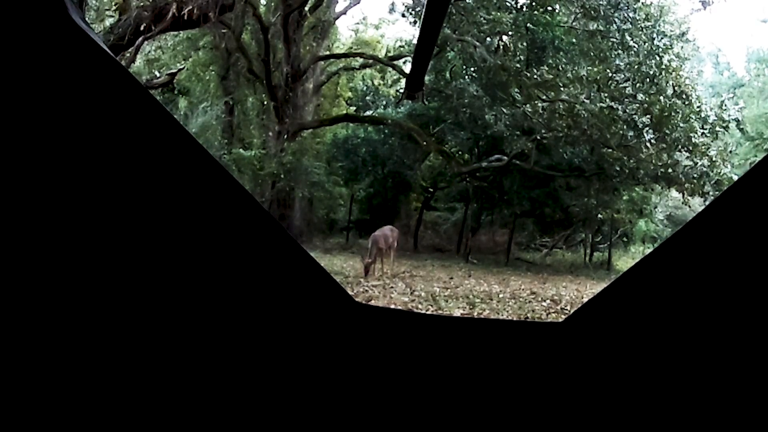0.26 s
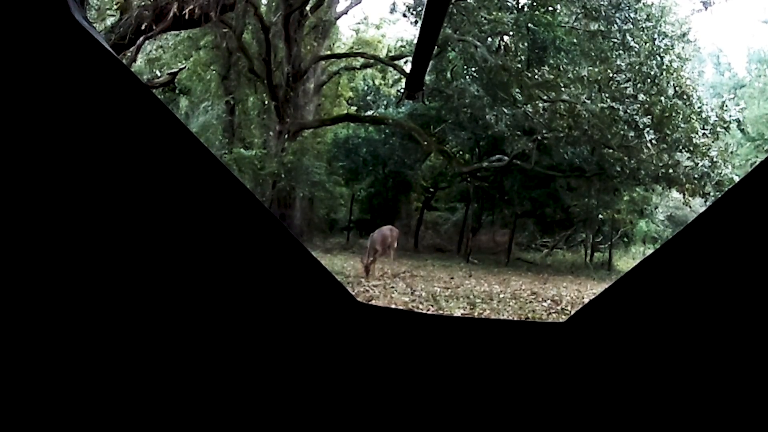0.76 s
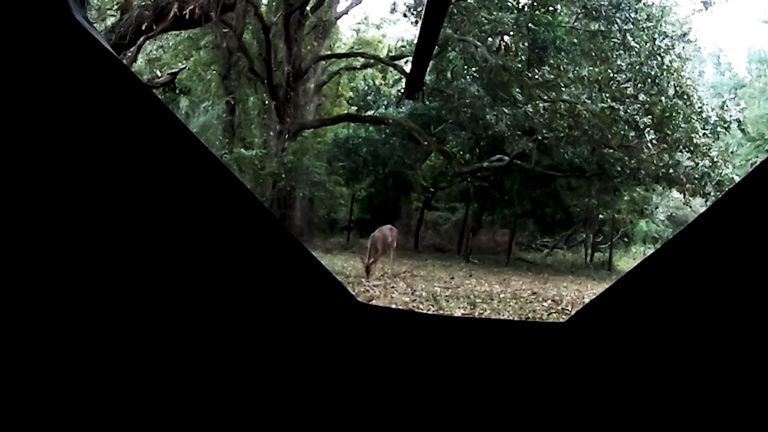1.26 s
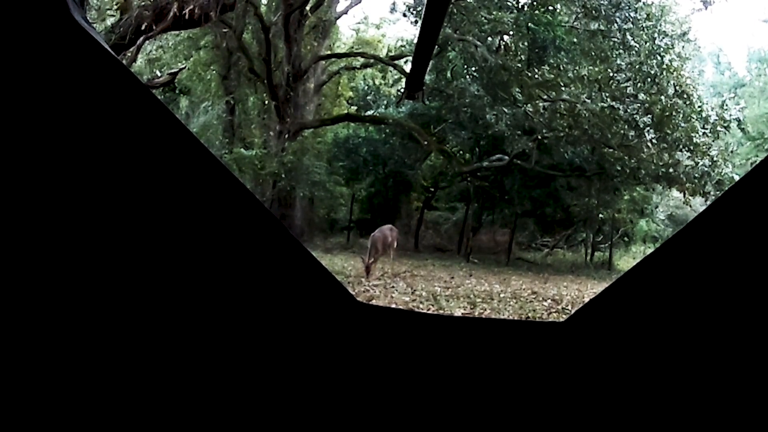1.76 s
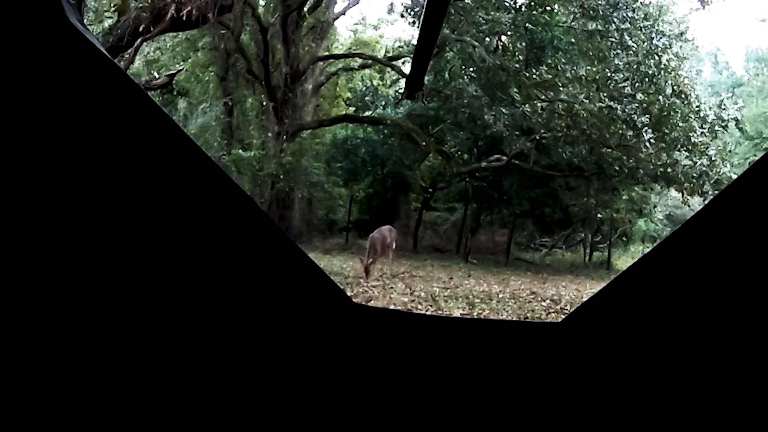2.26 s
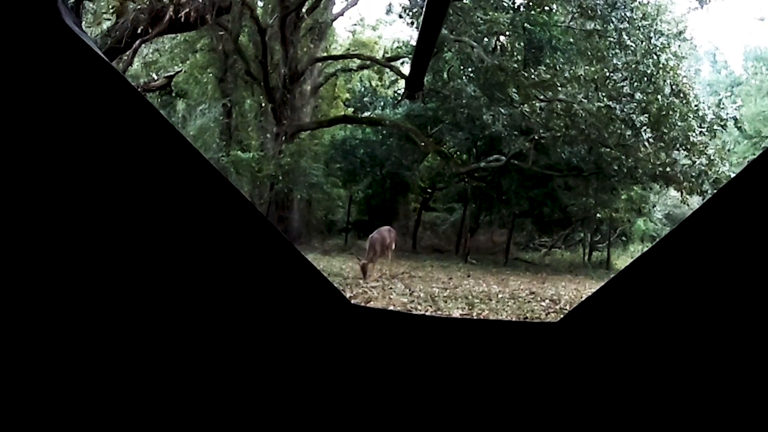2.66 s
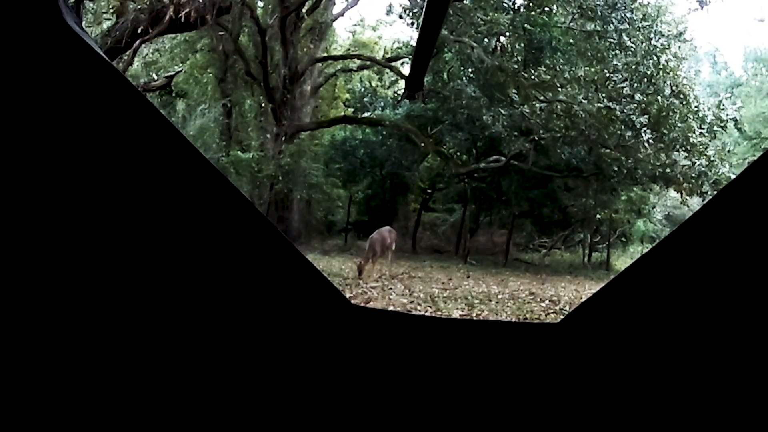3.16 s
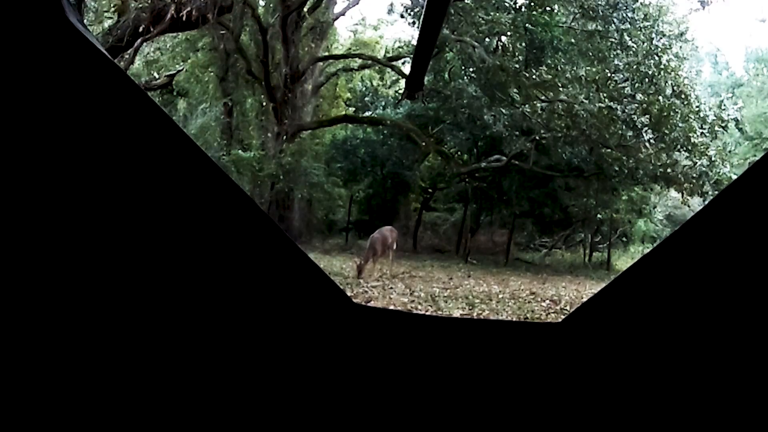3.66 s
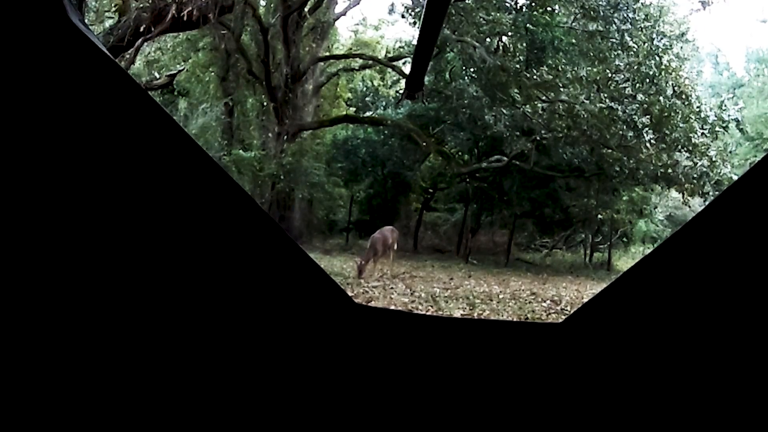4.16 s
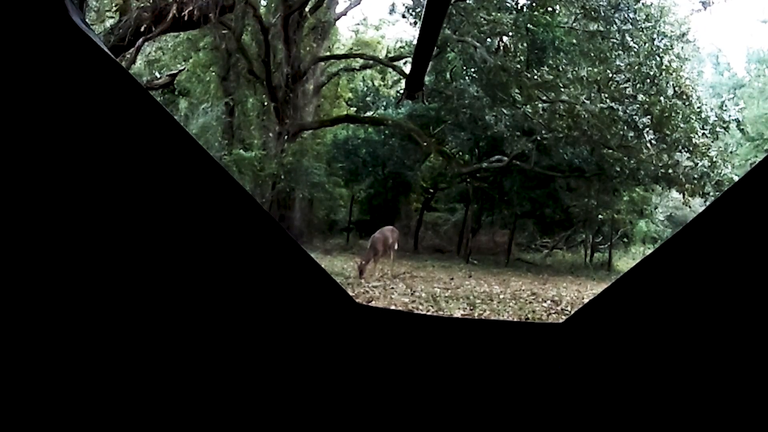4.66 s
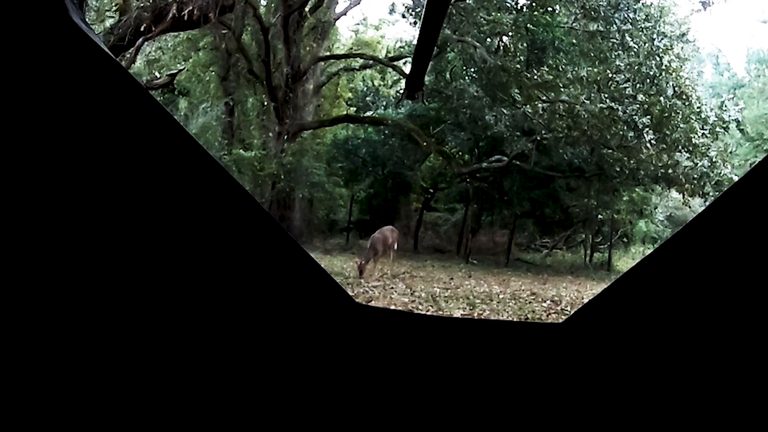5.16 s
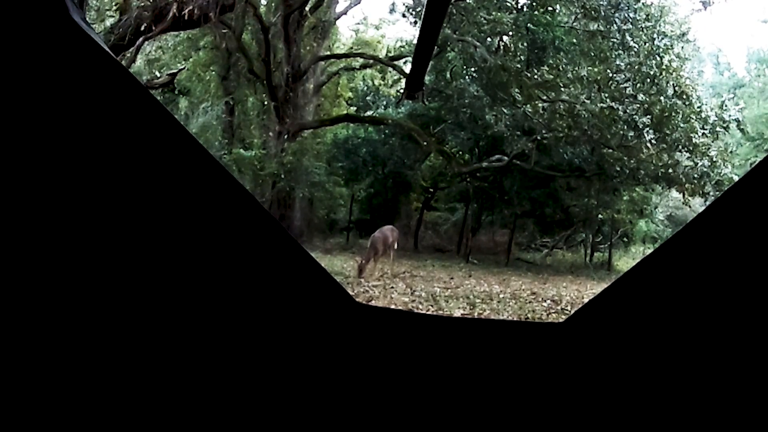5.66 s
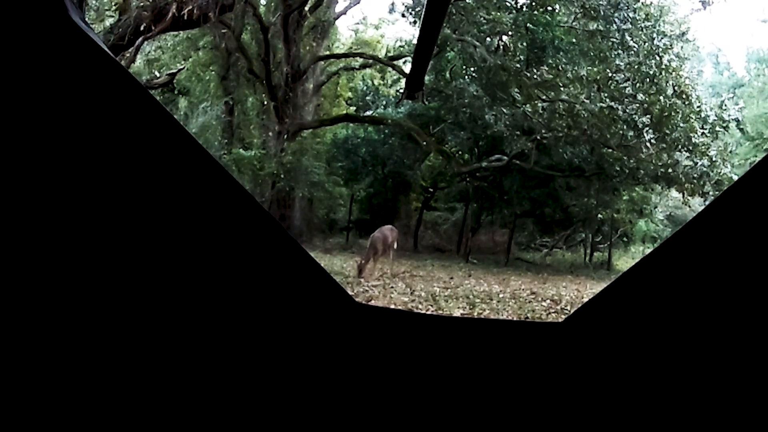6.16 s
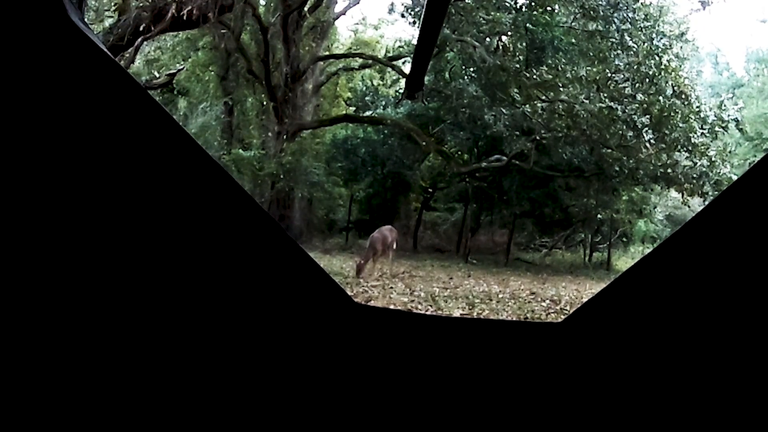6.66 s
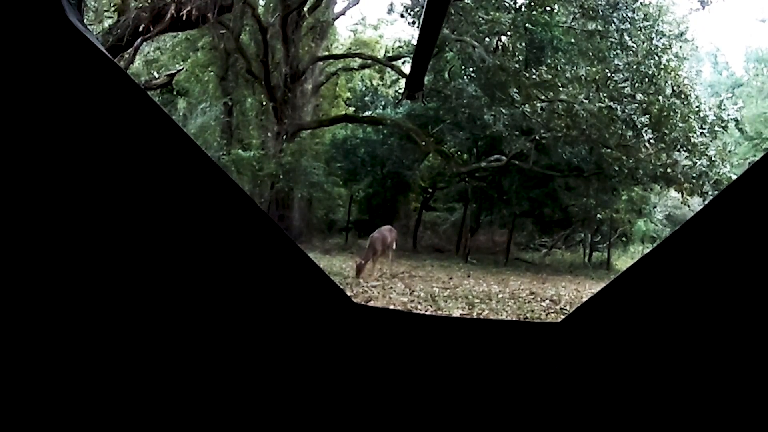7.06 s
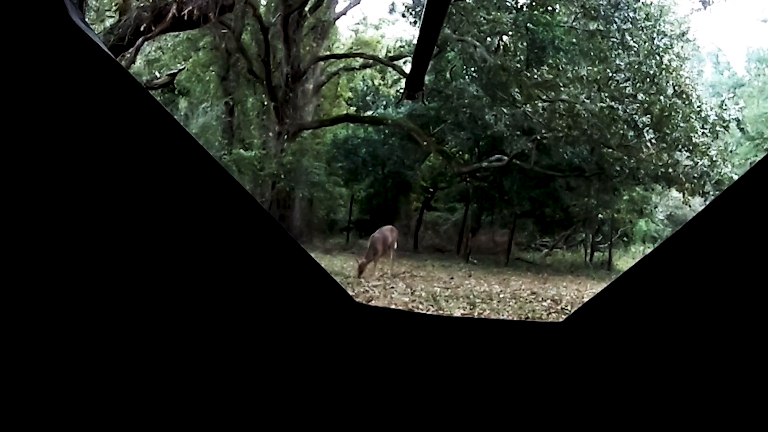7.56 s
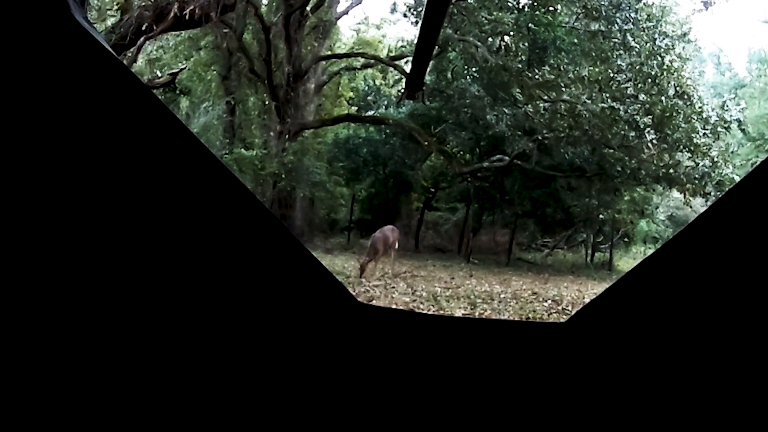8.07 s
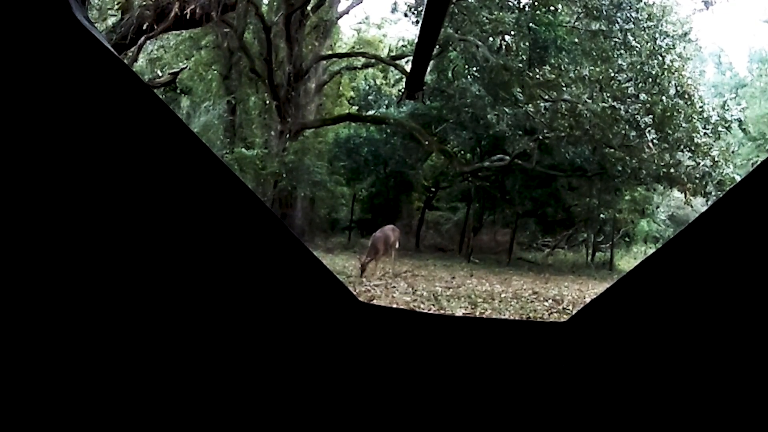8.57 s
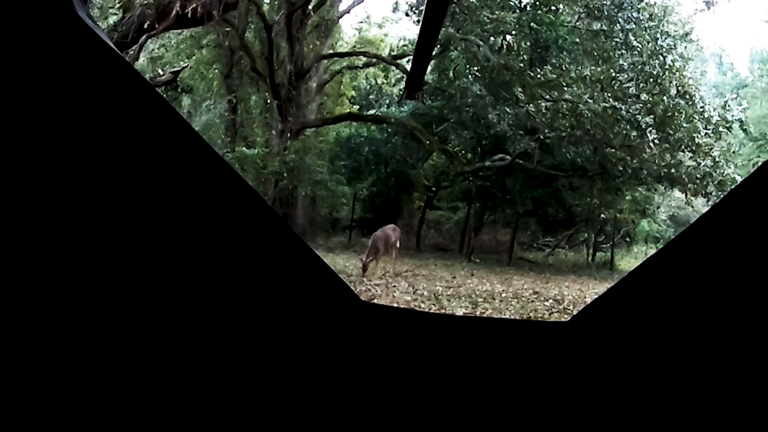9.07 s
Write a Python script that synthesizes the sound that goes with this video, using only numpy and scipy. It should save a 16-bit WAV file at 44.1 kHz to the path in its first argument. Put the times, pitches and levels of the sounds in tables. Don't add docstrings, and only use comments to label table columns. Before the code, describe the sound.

Crickets trill steadily over a low insect buzz in leafy woods; a small bird whistles two quick songs, then a low thump knocks the microphone.

```python
import sys
import numpy as np
from scipy import signal
from scipy.fft import rfft, irfft, next_fast_len
from scipy.io import wavfile

SR = 44100
rng = np.random.default_rng(int(sys.argv[2]) if len(sys.argv) > 2 else 0)


def int16_out(signal):
    q = np.round(np.clip(np.atleast_2d(signal).T, -1, 1) * 32767)
    wavfile.write(sys.argv[1], SR, q.astype(np.int16))


def how_loud(loudness_db):
    steps = np.asarray(loudness_db, float) / 20
    return 10 ** steps


N = 411012
TIME = np.arange(N) / SR
# f/Hz, level/dB
WIDTH = [(60, -10), (100, -2), (170, -1), (300, 3), (500, 8.5), (850, 12), (1450, 6.5), (2470, 1.5),
         (4200, -5), (7140, 12)]


def rms_one(x):
    return x / np.sqrt(np.mean(x ** 2) + 1e-20)


def level(rows):
    return how_loud(np.interp(TIME, *np.transpose(rows)))


def drift(rate):
    points = rng.standard_normal(400)
    return np.interp(TIME * rate, np.arange(400), points)


def at_hz(points, hz, beyond=None):
    f, db = np.transpose(points)
    return np.interp(np.log(hz + 1e-3), np.log(f), db, left=beyond, right=beyond)


def coloured(spectrum, width):
    size = next_fast_len(N, real=True)
    hz = np.fft.rfftfreq(size, 1 / SR)
    gains = how_loud(at_hz(spectrum, hz, -120)) * [hz ** 0, how_loud(at_hz(width, hz))]
    noise = rfft(rng.standard_normal((2, size)))
    mid, side = irfft(noise * gains, size)[:, :N]
    return np.array([mid + side, mid - side]) / np.std(mid)


def panned(x, pan_db):
    return x * how_loud([[pan_db / 2], [-pan_db / 2]])


def woods(x, t60, gap_s):
    t = TIME[:SR]
    tail = rng.standard_normal((2, SR)) * how_loud(-60 * t / t60) * np.clip(t / gap_s, 0, 1)
    tail = tail / np.sqrt(np.sum(tail ** 2) / 2)
    return signal.fftconvolve(np.atleast_2d(x), tail, axes=1)[:, :N]


def add(out, rows, start_s=0, lead=0., stretch=0.96, waver=0.0052, gain=1):
    s, hz, db = np.transpose(rows)
    span = slice(int((start_s + s[0]) * SR), int((start_s + s[-1]) * SR))
    t = TIME[span] - start_s
    edges = np.clip(np.minimum(t - s[0], s[-1] - t) / 0.001, 0, 1)
    wobble = np.interp(t - s[0], np.arange(30) * 0.00278, rng.standard_normal(30))
    glide = stretch * np.interp(t, s, hz) * (1 + waver * wobble)
    phase = 2 * np.pi * np.cumsum(glide) / SR
    out[:, span] += gain * edges * how_loud(np.interp(t, s, db)) * np.sin(phase + [[lead], [0]])
    return out


def traffic():
    # f/Hz, level/dB
    rumble_spectrum = [(65, -47), (110, -18), (144, -3.5), (183, -1), (233, -9), (269, -17), (311, -16),
                       (350, -18.5), (458, -21), (534, -27), (778, -19.5), (1020, -33), (1100, -39.5),
                       (1430, -46), (2420, -120)]
    # t/s, level/dB
    nearness = [
        (0.0, -56),
        (0.31, -53),
        (2.92, -53),
        (7.25, -55),
        (9.3, -55),
    ]
    # f/Hz, level/dB
    deep_spectrum = [(8.8, -38), (15, -3.5), (48, -6), (70, -3.5), (86, -3.5), (108, -14.5), (113, -15),
                     (120, -17), (160, -40), (260, -120)]
    rumble = level(nearness) * how_loud(3.0) * coloured(rumble_spectrum, WIDTH)
    deep = how_loud(-57.5 + 3.1 * drift(10)) * coloured(deep_spectrum, [(20, -5), (50, -2.5), (110, 1)])
    return rumble + deep


def moving_air():
    # f/Hz, level/dB
    air_spectrum = [(560, -18), (950, -6.5), (1070, -9), (1410, -8), (2600, -15), (3520, -3.5),
                    (3970, -13.5), (4430, -15.5), (5000, -15.5), (5300, -9.5), (6890, -29), (11700, -120)]
    return how_loud(-64) * coloured(air_spectrum, WIDTH)


def capsule_hiss():
    # f/Hz, level/dB
    hiss_spectrum = [(7000, -30), (8000, -7), (8700, -5), (9300, -1), (10500, 0), (12200, -1), (13300, -4),
                     (14300, -10), (15100, -15), (15600, -60)]
    return how_loud(-76.5) * coloured(hiss_spectrum, [(8000, -0.27), (15000, -.3)])


def insect_drone():
    # f/Hz, level/dB
    drone_spectrum = [(3000, -17.5), (3250, -10), (3550, 0.5), (3800, -10.5), (4100, -20)]
    # t/s, level/dB
    drone_loudness = [(0, -65), (1.2, -66.5), (2.5, -62.5), (3.8, -67.5), (4.6, -62.5), (5.6, -66.5),
                      (6.9, -64), (9.32, -69)]
    swell = level(drone_loudness) * how_loud(2.1 * drift(6.4))
    return swell * coloured(drone_spectrum, [(3000, -12), (4000, -10.5)])


def cricket(top_hz, rate_from, rate_to, first_s, half_s=.0125, sag=.06, uneven_db=0.5):
    strokes = rate_from * (TIME - first_s) + (rate_to - rate_from) * TIME ** 2 / (2 * TIME[-1])
    number = np.round(strokes).astype(int)
    chance = rng.standard_normal((200, 3))[number + 2]
    place = np.clip((strokes - number) / rate_from / half_s, -1, 1)
    hz = top_hz * (1 - sag * place ** 2 + .002 * chance[:, 0])
    envelope = (1 - place ** 2) ** 0.79 * how_loud(uneven_db * chance[:, 1])
    return envelope, 2 * np.pi * np.cumsum(hz) / SR + 9 * chance[:, 2]


def far_chorus(count=6):
    # f/Hz, level/dB
    chorus_spectrum = [(4600, -60), (5100, -43.5), (5630, -13), (5830, -12), (6110, -4.5), (6500, -6.5),
                       (6740, -10), (7200, -20.5), (7650, -28), (8000, -34), (8500, -62), (9500, -90)]
    singers = np.zeros(N)
    for hz, (rate, first) in zip(np.linspace(5600, 7200, count), rng.random((count, 2))):
        pulse_rate = 13 + 3.5 * rate
        envelope, phase = cricket(hz, pulse_rate, pulse_rate, first / 17)
        singers += how_loud(at_hz(chorus_spectrum, hz)) * envelope * np.sin(phase)
    blur = coloured(chorus_spectrum, [(5000, 1.5), (8000, .5)])
    return how_loud(-6.5) * rms_one(woods(singers, t60=0.22, gap_s=0.0028)) + how_loud(-5.5) * blur


def far_birds():
    # t/s, f/Hz, level/dB
    chip_glide = [
        (1.983, 6500, -64),
        (1.989, 6900, -54),
        (1.998, 7300, -50),
        (2.012, 7940, -70),
        (2.02, 7840, -75.5),
    ]
    start_s, step_s = 4.261, .0684
    trill = np.zeros((2, N))
    for k, away in enumerate(np.linspace(-1.05, .95, 16) ** 4):
        hz, db = 4520 - 380 * away, -69 - 6 * away
        rising = [(-.01, hz * .95, db + 2), (0, hz * 1.02, db + 3), (.012, hz * 1.12, db)]
        add(trill, rising, start_s + k * step_s, waver=.015)
    chip = add(np.zeros((2, N)), chip_glide)
    far_trill = how_loud(1.5) * trill + how_loud(9.5) * woods(trill, t60=0.49, gap_s=.004)
    return far_trill + panned(chip, 4) + how_loud(12) * woods(chip, t60=0.24, gap_s=0.0068)


def bumps():
    knocks = [
        (5.438, -36, -34.5, 0.0078, 0.0),
        (5.480, -40, -38, 0.011, 0.0),
        (8.587, -22, -12.3, .021, .007),
        (8.636, -40, -27, 0.017, .012),
        (8.706, -34, -24, .018, .007),
        (8.787, -50, -37, 0.019, .007),
    ]
    # f/Hz, left level/dB, right level/dB, left pitch factor
    spring_modes = [
        (72, 0.0, 0.0, 1.04),
        (156, -14, -22, 1.0),
        (225, -25, -34, 1.0),
    ]
    out = np.zeros((2, N))
    for s, left_db, right_db, swing_s, lag_s in knocks:
        span = slice(int((s - .1) * SR), int((s + .2) * SR))
        t = TIME[span] - s - np.array([[lag_s], [0]])
        spread_s = np.where(t < 0, swing_s, 1.7 * swing_s)
        envelope = how_loud([[left_db], [right_db]]) * np.exp(-(t / spread_s) ** 2)
        for hz, left, right, left_pitch in spring_modes:
            mode_hz = hz * np.array([[left_pitch], [1]])
            out[:, span] += envelope * how_loud([[left], [right]]) * np.cos(2 * np.pi * mode_hz * t)
    return out


def wren_note(start_s, length_s, first_hz, turn_hz, last_hz, turn, crest, db, fall_db):
    place = np.linspace(0, 1, num=17)
    turn, crest = np.clip(turn, .05, .95), np.clip(crest, .05, .95)
    before = np.clip(1 - place / turn, 0, 1)
    after = np.clip((place - turn) / (1 - turn), 0, 1)
    hz = turn_hz + (first_hz - turn_hz) * before ** 1.504 + (last_hz - turn_hz) * after ** 1.52
    rise = 23.5 * np.clip(1 - place / crest, 0, 1) ** 2.06
    fall = fall_db * np.clip((place - crest) / (1 - crest), 0, 1) ** 1.43
    return np.transpose([start_s + length_s * place, hz, db - rise - fall])


def wren():
    # start in phrase t/s, length/s, first f/Hz, turning f/Hz, last f/Hz
    phrase_notes = [
        (-.022, 0.0168, 3450, 4040, 4020),
        (-.007, .035, 2896, 3211, 2730),
        (0.03, .037, 3050, 4130, 4160),
        (.089, .019, 5520, 4325, 4300),
        (.110, .029, 3150, 3235, 3116),
        (0.133, .047, 3100, 2455, 2520),
        (.213, .023, 2604, 2887, 2700),
        (.234, .036, 2404, 1640, 1590),
    ]
    # pitch turn place/0-1, crest place/0-1, crest level/dB, end loss/dB
    breaths = [(.9, .6, -16, 15), (.3, .4, 6, 21), (0.79, 0.27, -0.5, 15.5), (0.91, 0.25, -7.5, 10.5),
               (0.27, 0.65, 1.5, 10), (0.37, .3, -11, 17), (.6, .6, -8.5, 6), (.9, 0.08, -6.5, 12.5)]
    # pan/dB, left phase lead/rad
    note_places = [(14, 1.2), (0, 1.06), (3.5, 2.2), (12, .8), (-4.5, 1.3), (11, 1.86), (7, 2.6),
                   (-1, 0.87)]
    # t/s, level/dB, opening note extra/dB, low notes extra/dB, low notes pitch factor
    phrases = [
        (2.1933, -44, -5, 4, 1.0),
        (2.55, -40, 0.5, 0.5, 1.0),
        (2.9111, -40.5, 1.5, -2.5, 0.97),
        (5.792, -43.5, -3, 2.5, 0.98),
        (6.1523, -42, -2, 0.5, 0.96),
        (6.5215, -43, 1, 2, 0.99),
    ]
    # delay t/s, left level/dB, right level/dB
    trunk_echoes = [
        (.052, -16, -13),
        (.118, -19, -18),
        (.185, -21, -20),
    ]
    direct = np.zeros((2, N))
    for s, db, opening_db, low_db, low_pitch in phrases:
        stresses = [0, opening_db, 0, 0, 0, low_db, low_db, 0]
        pitches = [1, 1, 1, 1, 1, low_pitch, low_pitch, 1]
        for note, breath, (pan_db, lead), stress_db, pitch in zip(
                phrase_notes, breaths, note_places, stresses, pitches):
            gain = panned(how_loud(db + stress_db), pan_db)
            add(direct, wren_note(*note, *breath), s, lead, pitch, waver=.008, gain=gain)
    voice = direct[0] * how_loud(-4) + direct[1] * how_loud(-6)
    echoes = np.zeros((2, N))
    for s, left_db, right_db in trunk_echoes:
        echoes += np.roll(voice, int(s * SR)) * how_loud([[left_db], [right_db]])
    near_leaves = how_loud(-4) * woods(direct, t60=.06, gap_s=.002)
    trunks = woods(echoes, t60=.11, gap_s=.005)
    deep_woods = how_loud(-2.5) * woods(direct[0], t60=1.0, gap_s=0.014)
    return how_loud(-5.5) * direct + near_leaves + trunks + deep_woods


def near_crickets():
    songs = [
        (6095, 14.88, 14.9, .0424, -44.5),
        (5998, 14.52, 14.46, 0.0057, -46.5),
        (6390, 14.48, 14.56, 0.04324, -50),
        (6220, 16, 15, 0.0351, -53),
        (6500, 15.24, 15.26, .0512, -52),
    ]
    # half stroke/s, pitch sag/0-1, octave level/dB, left lag/us, pan/dB
    wings = [(.0125, .055, -34, 222, .9), (.015, .017, -50, 232, 3.5), (.012, .025, -56, 0, 0),
             (.012, .03, -56, -64, -4), (.012, .03, -56, -52, -2.5)]
    out = np.zeros((2, N))
    for (hz, rate_from, rate_to, first_s, db), (half_s, sag, octave_db, lag, pan_db) in zip(songs, wings):
        envelope, phase = cricket(hz, rate_from, rate_to, first_s, half_s, sag)
        phase = np.array([np.interp(TIME - lag / 1012000.0, TIME, phase), phase])
        tone = np.sin(phase) + how_loud(octave_db) * np.sin(2 * phase)
        out += panned(how_loud(db + 10 + 1.1 * drift(1.604)) * envelope * tone, pan_db)
    return out + how_loud(-10) * woods(out, t60=0.81, gap_s=0.0088)


def scene():
    # t/s, level/dB
    chorus_effort = [
        (0, -44),
        (2.7, -44),
        (3.5, -45),
        (4.5, -43.5),
        (6, -43.5),
        (7.2, -45),
        (8.2, -43.5),
        (9.32, -45.5),
    ]
    effort = level(chorus_effort)
    background = traffic() + moving_air() + capsule_hiss() + insect_drone()
    insects = effort * far_chorus() + effort / effort.mean() * near_crickets()
    return background + far_birds() + bumps() + wren() + insects


def low_pass(x):
    return signal.sosfilt(signal.butter(12, 15100, fs=SR, output="sos"), x)


def record(dry):
    return low_pass(dry)


dry = scene()
out = record(dry)
int16_out(out)
```